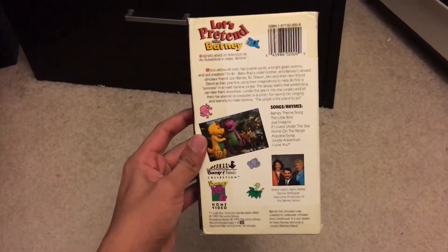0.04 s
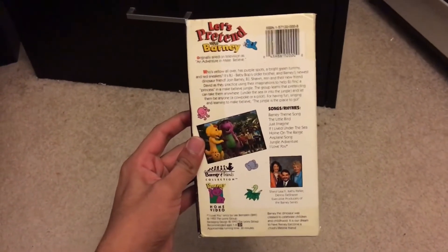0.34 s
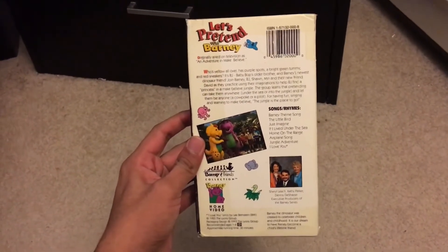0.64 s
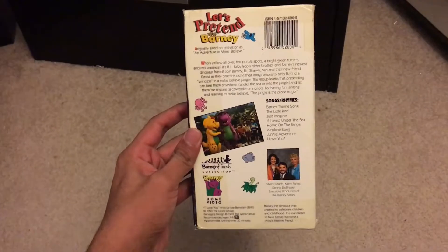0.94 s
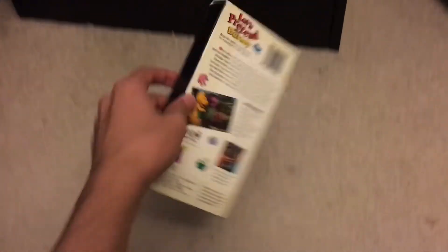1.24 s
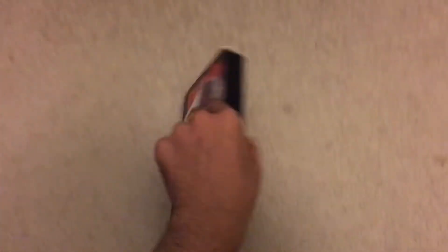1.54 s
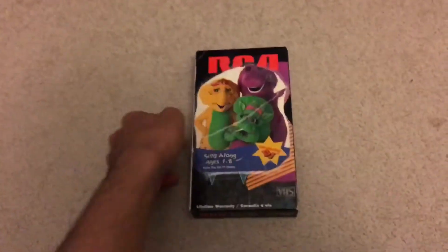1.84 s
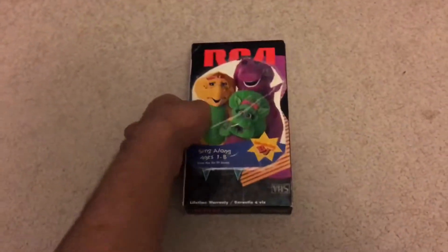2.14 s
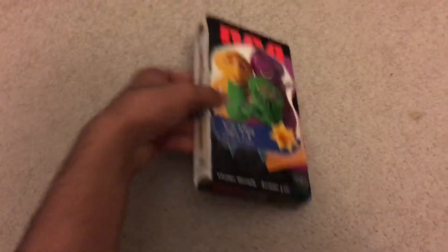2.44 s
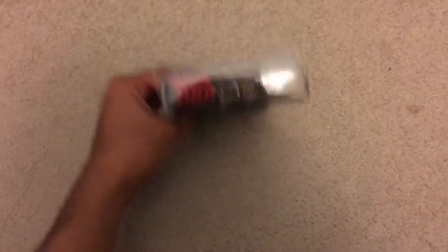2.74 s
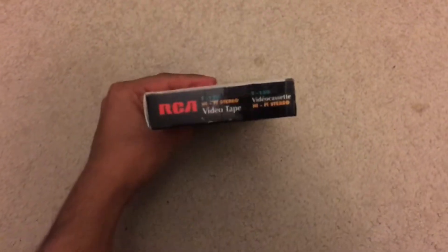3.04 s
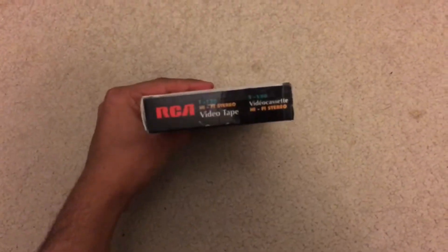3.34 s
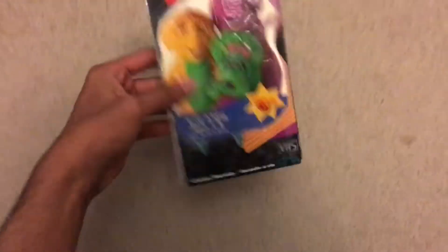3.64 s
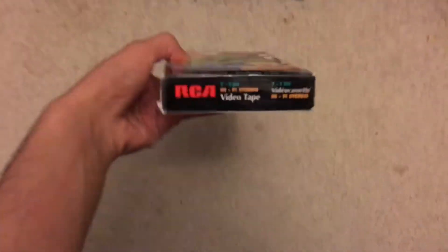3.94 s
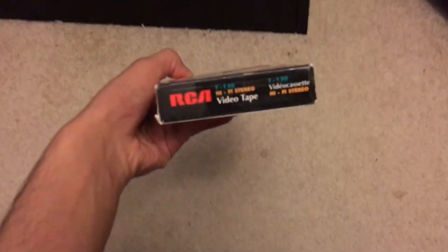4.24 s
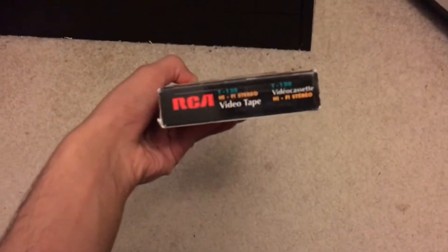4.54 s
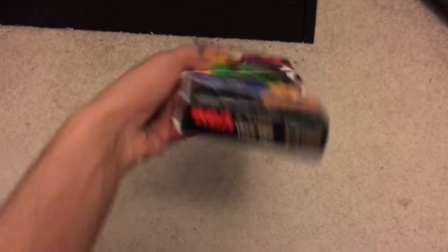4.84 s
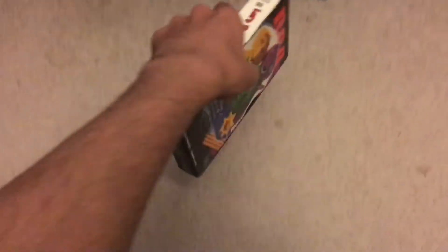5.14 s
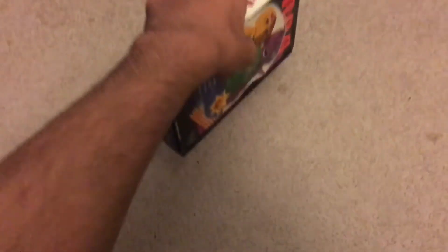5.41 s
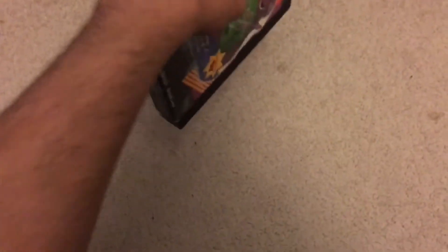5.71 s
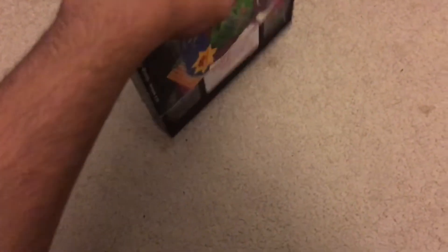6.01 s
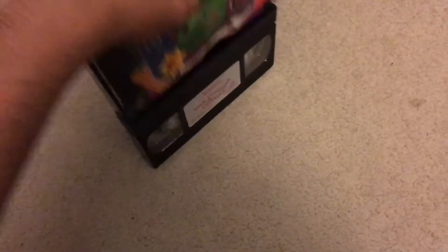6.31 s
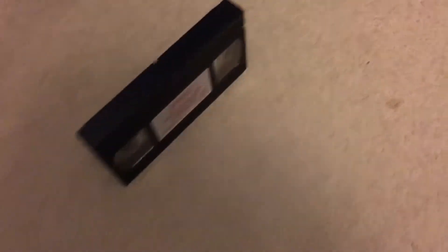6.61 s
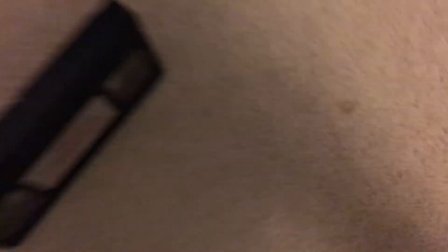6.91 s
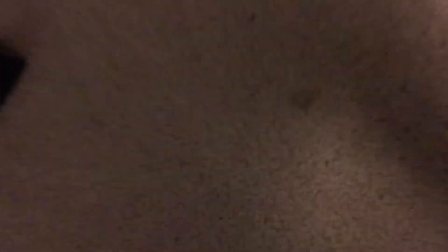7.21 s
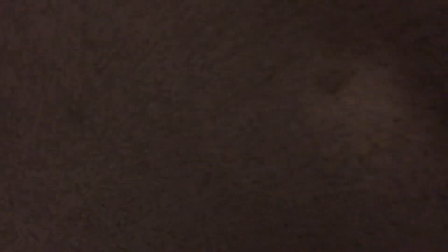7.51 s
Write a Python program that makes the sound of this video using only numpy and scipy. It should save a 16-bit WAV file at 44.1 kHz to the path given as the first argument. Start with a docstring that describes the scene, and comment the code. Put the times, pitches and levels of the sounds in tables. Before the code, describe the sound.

A video cassette is turned over in its card sleeve, giving a cluster of sharp, hollow plastic clacks with a thud and a brief rattle. A second burst of clacks follows, then light taps and faint finger brushes. The cassette slides out with a short rustle and a couple of clicks. A few dull knocks close to the microphone come last, over the low air hiss of a small, quiet room.

```python
"""Cassette out of its sleeve

A hand turns a tape cassette over in its card sleeve and lets it slide out onto a carpet.
The loose cassette clacks and thuds: each blow is a chatter of tiny contacts ringing its plastic shell.
Fingers hiss on the card, plastic catches and slips on the way out, and a few dull knocks follow close by.
The room is small and quiet, with a low steady rush of air."""
import sys
import numpy as np
from scipy import signal
from scipy.fft import rfft
from scipy.io import wavfile
from scipy.ndimage import uniform_filter1d

SR = 44100
rng = np.random.default_rng(int(sys.argv[2]) if len(sys.argv) > 2 else 0)


def wav_out(sig):
    """Save sig, one row per channel (or a flat mono array), as 16-bit PCM at SR to the path in sys.argv[1]."""
    wavfile.write(sys.argv[1], SR, np.round(np.clip(np.atleast_2d(sig).T, -1, 1) * 32767).astype(np.int16))


N = 337806
SIZE = 8192  # samples in one blow or filter
HZ = np.fft.rfftfreq(SIZE, 1 / SR)
AGE, TIME = np.arange(SIZE) / SR, np.arange(N) / SR


def amp(db):
    """Decibels to gain."""
    return 10 ** (np.asarray(db) / 20)


def unit(x):
    """Scales to rms 1."""
    return x / np.sqrt(np.mean(x ** 2) + 1e-20)


def curve(points, hz=HZ):
    """Joins breakpoints on a log-frequency axis."""
    f, value = np.transpose(points)
    return np.interp(np.log(hz + 1), np.log(f), value)


def bells(modes):
    """Resonances as a bell EQ curve in dB."""
    return sum(db / (1 + (2 * (HZ - hz) / width) ** 2) for hz, width, db in modes)


def ring(x, eq_db):
    """Minimum-phase EQ, so that peaks ring on after a blow."""
    log_gain = np.log(amp(np.r_[eq_db, eq_db[-2:0:-1]]))
    response = np.fft.ifft(np.exp(np.conj(signal.hilbert(log_gain)))).real
    return signal.fftconvolve(x, response[:SIZE // 2])[:len(x)]


def add(mix, s, sound):
    """Mixes a sound in at s seconds."""
    part = mix[round(s * SR):][:len(sound)]
    part += sound[:len(part)]


def grains(count, per_s, spread_db):
    """Random tiny contacts of uneven size."""
    size = amp(spread_db * np.minimum(rng.exponential(1, count), 4))
    return unit(size * rng.standard_normal(count) * (rng.random(count) < per_s / SR))


def strokes(rows):
    """Friction envelope: each stroke swells to its peak at t and dies away."""
    return np.max([amp(db) * np.exp(-np.maximum((s - TIME) / swell, (TIME - s) / fade))
                   for s, db, swell, fade in rows], axis=0)


def blows(rows, body_db, bass_hz=520, treble_hz=3600, spot_db=4, note_db=5):
    """Each blow is a dying chatter of tiny contacts that rings the body; hard corners are brighter."""
    out = np.zeros(N)
    low_shelf = 1 / (1 + (HZ / bass_hz) ** 4)
    high_shelf = 1 - 1 / (1 + (HZ / treble_hz) ** 2)
    for s, db, chatter, bass_db, treble_db, spot_hz in rows:
        attack = 1 - np.exp(-AGE / min(0.0012, 0.3 * chatter))
        force = grains(SIZE, per_s=14000, spread_db=1) * attack * np.exp(-AGE / chatter)
        # flatten the chatter's own spectrum, so the body sets the tone
        uneven_db = 10 * np.log10(uniform_filter1d(abs(rfft(force)) ** 2, size=60) + 1e-9)
        # the struck spot favours a broad band, with a short note at its centre
        spot = bells([(spot_hz, 0.49 * spot_hz, spot_db), (spot_hz, 0.035 * spot_hz, note_db)])
        tone_db = body_db + bass_db * low_shelf + treble_db * high_shelf + spot
        add(out, s, ring(force, db + tone_db - uneven_db))
    return out


# tone of cassette and sleeve: f/Hz, level/dB
SHELL_EQ = [(50, -16), (150, 0.5), (420, 2), (640, -6), (1100, -2.5), (2300, -4), (4000, -8.5), (7000, -13),
            (9500, -15.5), (10600, -20.5), (13000, -16.5), (16000, -26)]
# resonances of the plastic: f/Hz, width/Hz, gain/dB
SHELL_MODES = [(432, 15, 6), (515, 27, 7), (740, 37, 5.5), (1047, 28, 4.5), (1230, 50, 3.5),
               (1404, 60, -2.5), (1656, 70, 5), (1820, 84, 3.5), (2040, 35, 1.5), (2270, 28, 4),
               (2270, 18, 1.5), (2640, 41, 4), (2830, 51, -5), (3280, 83, 5), (4120, 160, 4.5),
               (5620, 300, 5.5)]
def shell():
    """The sleeved plastic shell's voice, as an EQ curve in dB."""
    return curve(SHELL_EQ) + bells(SHELL_MODES)


# cassette hits sleeve: t/s, level/dB, chatter/s, bass/dB, treble/dB, spot f/Hz
CLACKS = [(1.4287, 11.5, 0.0052, -1, -2, 3150), (1.4415, 4.5, 0.0052, 6.5, -2, 2200),
          (1.456, -6.5, 0.0097, 10, 7, 2000), (1.4827, 1.8, 0.006, 7, 3, 3760),
          (1.494, 3.5, 0.0028, -4, -6.5, 1550), (1.5768, 14, 0.011, 0, -9.5, 1104),
          (1.588, 7.7, 0.007, 13, 3, 2400), (2.6782, -8.5, .009, 17, 4, 1000),
          (2.685, 12.5, 0.0082, 3, -1, 1350), (2.702, 11, 0.0032, 0, -1.5, 1270),
          (2.707, 6.5, 0.0091, 3, 1.5, 2010), (2.7157, 5, 0.0045, 4.5, -4, 1590),
          (6.1125, 2, 0.0064, 1, 5.5, 724), (6.1283, 1.8, 0.01, 3.5, 1, 760)]
def clacks(settle_s=1.648, gap_s=0.0355):
    """The loose cassette clacks, rattles to rest in ever weaker, shorter rebounds and snaps once."""
    rebounds = [(settle_s + k * gap_s, -6 - 8 * k, 0.015 * 0.66 ** k, 10.5 - 11 * k, 4, 3500)
                for k in range(3)]
    snap = (2.6208, -4.7, 0.0011, -3, 11, 7500)
    return blows(CLACKS + rebounds + [snap], shell())


# the weight under the blows: t/s, level/dB, f/Hz
THUDS = [(1.429, -25, 432), (1.439, -31, 440), (1.578, -5, 204), (1.592, -19, 264), (2.6837, -16.5, 413),
         (2.7055, -18, 267), (6.127, -36, 238), (7.182, -36, 332), (7.193, -39, 200), (7.231, -26.5, 175),
         (7.477, -38, 186), (7.508, -38, 219)]
def thuds(full_level_swell_s=0.0024, soften_db=24.5):
    """The whole mass stops in a few cushioned low swings; the harder the blow, the shorter the push."""
    out = np.zeros(N)
    for s, db, hz in THUDS:
        swell = full_level_swell_s * 2 ** (-db / soften_db)
        push = (AGE / swell * np.exp(1 - AGE / swell)) ** 2
        add(out, s, amp(db) * push * np.sin(2 * np.pi * hz * AGE))
    return out


# light taps on card and plastic: t/s, level/dB, chatter/s, treble/dB, spot f/Hz
TAPS = [(1.1365, -44.5, .0033, 21, 9000), (1.286, -18, 0.0056, -1, 6500), (1.538, -26, 0.0024, 4, 7000),
        (1.555, -21, 0.0045, 2, 6000), (2.2365, -33, .002, 9, 6500), (2.469, -35, .002, 7, 6500),
        (2.549, -16, 0.018, -4.5, 3500), (2.660, -12.5, 0.0035, -3, 2190), (3.024, -25, .0026, 6.5, 2540),
        (3.513, -19, 0.0027, -1, 2520), (3.7272, -16.5, .008, 0, 2220), (3.964, -27.5, .003, 0, 7000),
        (4.718, -19, .002, -19, 1820), (4.8361, -22.5, 0.0079, 9, 2180), (5.4532, -12, .0077, -20, 1710),
        (6.2289, -10.5, 0.0031, -5.5, 6040), (6.585, -15, 0.0036, -26, 1180),
        (6.611, -18, 0.0034, -27, 1185), (6.6425, -14.5, 0.0023, -7, 1850)]
def taps(bass_db=-9.5, bass_tilt=-0.34):
    """Short blows with little weight behind them; the duller the tap, the rounder its low end."""
    rows = [(s, db, chatter, bass_db + bass_tilt * treble_db, treble_db, hz)
            for s, db, chatter, treble_db, hz in TAPS]
    return blows(rows, shell(), spot_db=5, note_db=6)


def slide_envelope(start_s=5.748, brake_s=6.145, free_s=6.225, full_speed_db=-46.5):
    """Friction grows as the cassette speeds up, dips as a knock brakes it and ends as it comes free."""
    speed = np.clip((TIME - start_s) / (free_s - start_s), 0, 1)
    brake = 1 - 0.46 * np.exp(-((TIME - brake_s) / 0.03) ** 2)
    release = np.exp(-np.maximum(TIME - free_s, 0) / 0.0081)
    return amp(full_speed_db) * (speed * brake) ** 0.36 * release


# tone of plastic on card: f/Hz, level/dB
SLIDE_EQ = [(110, -55), (180, -11.5), (305, 0), (506, -10), (683, -4), (1200, 1.5), (1470, -7), (1650, -4),
            (3370, -14), (3910, -12.5), (4720, -15.5), (12300, -21), (16000, -27)]
# the cassette catches in the sleeve: t/s, level/dB, swell/s, fade/s
SCRAPES = [(5.642, -38.5, 0.0048, 0.018), (5.673, -46, 0.0033, 0.011), (5.712, -60.5, .008, 0.023),
           (6.05, -51.5, 0.023, .02), (6.213, -51, .012, 0.0077)]
def slide(patchy_db=3, catch_db=1.5, smooth_above_hz=4000):
    """Plastic sticks and slips on card thousands of times a second; the tone shifts as it moves."""
    slips = ring(grains(N, per_s=18000, spread_db=0.4), curve(SLIDE_EQ) + 0.34 * bells(SHELL_MODES))
    hz, _, spectra = signal.stft(slips, SR, nperseg=512)
    patches = uniform_filter1d(rng.standard_normal(spectra.shape), size=6, axis=0)
    patches = unit(uniform_filter1d(patches, size=5, axis=1))
    patches /= 1 + (hz[:, None] / smooth_above_hz) ** 2  # the fine hiss stays even
    catches = unit(uniform_filter1d(rng.standard_normal(spectra.shape[1]), size=3))
    texture = signal.istft(spectra * amp(patchy_db * patches + catch_db * catches))[1][:N]
    return (strokes(SCRAPES) + slide_envelope()) * unit(texture)


# close knocks: t/s, level/dB, chatter/s, bass/dB, treble/dB, spot f/Hz
KNOCKS = [(7.1833, -4, 0.0046, 10.5, -11, 357), (7.2293, 10, 0.0035, -4, 7.5, 1170),
          (7.287, -12.5, .0037, 6, 1, 4500), (7.442, 1, 0.0088, 4.5, -16, 935),
          (7.473, 2.8, 0.0042, 5, -21, 578)]
# their dark tone: f/Hz, level/dB
KNOCK_EQ = [(50, -10), (160, 0), (330, 0), (700, -8.5), (1000, -1), (1500, -7.5), (2200, -12.5),
            (3500, -27), (7000, -43.5), (16000, -42)]
# their resonances: f/Hz, width/Hz, gain/dB
KNOCK_MODES = [(547, 43, 9), (970, 98, 5.6), (1356, 88, 9.2), (1920, 120, 4)]
def knocks():
    """Dull blows that ring in the mids, with little top end."""
    return blows(KNOCKS, curve(KNOCK_EQ) + bells(KNOCK_MODES), treble_hz=1700)


def spring(jolt_s=2.707, peak_db=-42, hz=930, t60_s=0.37):
    """The spring of the cassette's flap, jolted once: a thin metal note that outlasts the clack."""
    age = np.maximum(TIME - jolt_s, 0)
    return amp(peak_db) * np.exp(-np.log(1000) * age / t60_s) * np.sin(2 * np.pi * hz * age)


# finger strokes on the sleeve: t/s, level/dB, swell/s, fade/s
BRUSHES = [(1.84, -68.5, .02, .15), (2.12, -66, 0.06, 0.15), (2.268, -59.5, 0.044, .028),
           (2.36, -68, 0.04, 0.084), (2.53, -69, .04, 0.045), (3.41, -67.5, .05, 0.069),
           (3.58, -56, 0.05, .056), (3.745, -56.5, 0.02, 0.042), (4.843, -61, 0.04, .022),
           (5.116, -70.5, 0.11, .04), (5.262, -66.5, 0.055, .05), (5.49, -64, 0.08, 0.061),
           (6.69, -66.5, 0.037, .07), (6.87, -72, 0.16, .6), (7.29, -59.5, 0.11, .13),
           (7.476, -54, .028, 0.0078), (7.61, -67, .05, .02)]
# tone of skin on card: f/Hz, level/dB
BRUSH_EQ = [(200, -11), (900, 6.5), (2200, 5), (4000, 3), (6500, -0.5), (9000, -2.5), (10500, -5.5),
            (13000, -3), (16000, -5)]
def fingers(trim_db=1):
    """Skin brushes the card in a fine, faint hiss."""
    texture = ring(grains(N, per_s=6000, spread_db=-1.5), curve(BRUSH_EQ))
    return amp(trim_db) * strokes(BRUSHES) * unit(texture)


# a hand shifts its grip close by: t/s, level/dB, swell/s, fade/s
GRIP_SHIFTS = [(7.262, -53.5, .008, 0.14), (7.437, -49.5, 0.039, 0.026)]
# tone of the rubbed casing: f/Hz, level/dB
GRIP_EQ = [(100, -9), (600, -3), (850, -9), (1010, 5.5), (1200, -12), (2000, -27), (5000, -25.5),
           (16000, -38)]
def grip():
    """Skin drags on a casing, which hums at one note."""
    texture = ring(grains(N, per_s=1700, spread_db=-2), curve(GRIP_EQ))
    return strokes(GRIP_SHIFTS) * unit(texture)


# reverb decay: f/Hz, T60/s
ROOM_T60 = [(100, 0.34), (300, 0.2), (1000, 0.18), (3000, 0.2), (8000, 0.15), (16000, 0.14)]
# low room resonances: f/Hz, width/Hz, gain/dB
ROOM_MODES = [(156, 11, 8), (295, 15, 3), (360, 15, 3), (431, 14, 1)]
def room(send, wet_db=-14, predelay_s=0.006, echoes_per_s=3000):
    """Sparse reflections from nearby furniture and walls, each band dying at its own speed."""
    count = SR // 2
    echoes = rng.choice([-1., 1.], count) * (rng.random(count) < echoes_per_s / SR)
    echoes *= TIME[:count] > predelay_s
    hz, t, spectra = signal.stft(echoes, SR, nperseg=256)
    decay = np.exp(-np.log(1000) * t / curve(ROOM_T60, hz)[:, None])
    tail = signal.istft(spectra * decay, SR)[1]
    tail = ring(tail / np.linalg.norm(tail), wet_db + bells(ROOM_MODES))
    return signal.fftconvolve(send, tail)[:N]


# room tone: f/Hz, level/dB
AIR_EQ = [(20, -5), (38, -7.5), (62, 0.5), (115, 0), (145, -8), (310, -13), (430, -18.5), (900, -17.5),
          (1300, -19), (2100, -25), (3000, -33), (5000, -39), (9000, -41.5), (10400, -46), (11500, -43),
          (16000, -46.5)]
# its resonances: f/Hz, width/Hz, gain/dB
AIR_MODES = [(313.7, 23, 6.5), (586, 35, 6.5), (868, 57, 3), (1020, 18, 4)]
def air(level_db=-54.5):
    """A steady low bed of rushing air, coloured by the room."""
    return amp(level_db) * unit(ring(rng.standard_normal(N), curve(AIR_EQ) + bells(AIR_MODES)))


def scene(thud_send_db=-3):
    """Mono mix: cassette, hand and knocks with their reverb, over the room tone."""
    foley = clacks() + taps() + slide() + fingers() + knocks() + grip()
    weight = thuds()
    reverb = room(foley + amp(thud_send_db) * weight)
    return (foley + weight + spring() + reverb + air())[None]


def record(dry, low_cut_hz=42, high_cut_hz=15950):
    """Rolls off the deepest bass and cuts the very top."""
    low_cut = signal.butter(3, low_cut_hz, "high", fs=SR, output="sos")
    high_cut = signal.firwin(511, high_cut_hz, window=("kaiser", 9), fs=SR)
    return signal.oaconvolve(signal.sosfilt(low_cut, dry), high_cut[None], "same")


dry = scene()
out = record(dry)
wav_out(out)
```